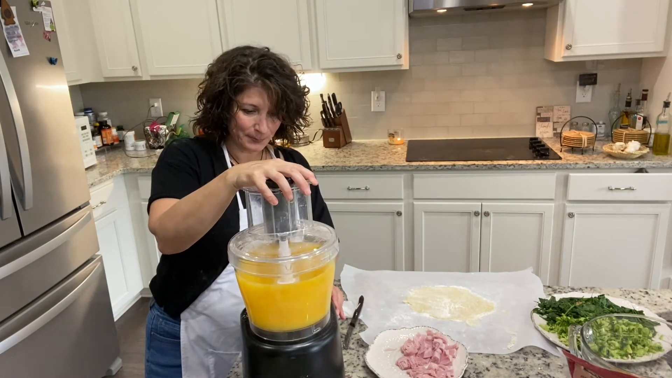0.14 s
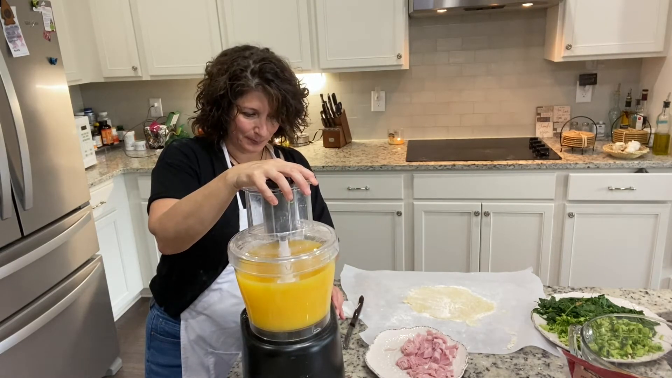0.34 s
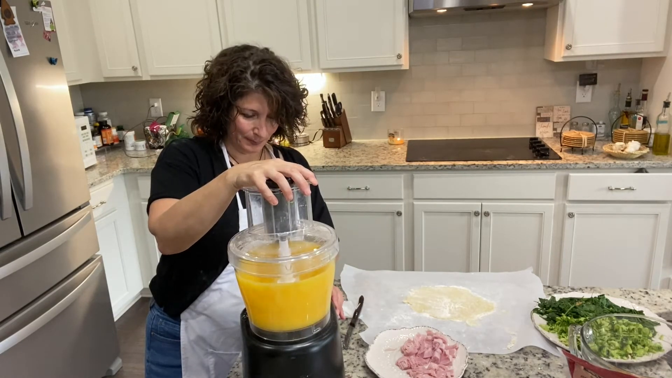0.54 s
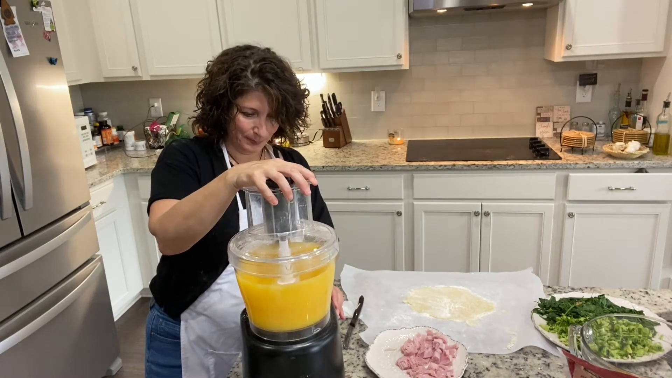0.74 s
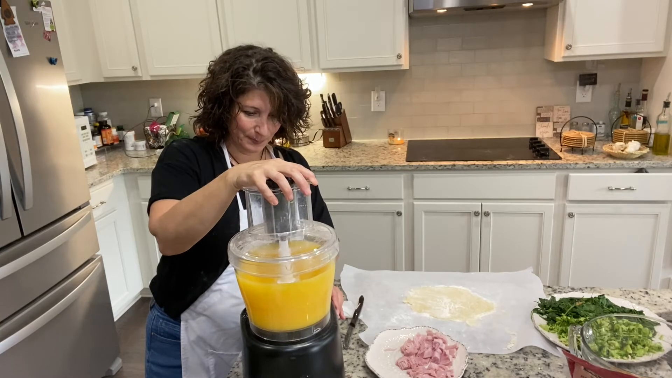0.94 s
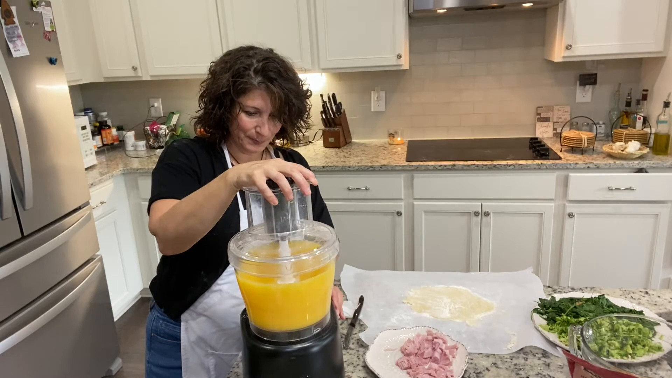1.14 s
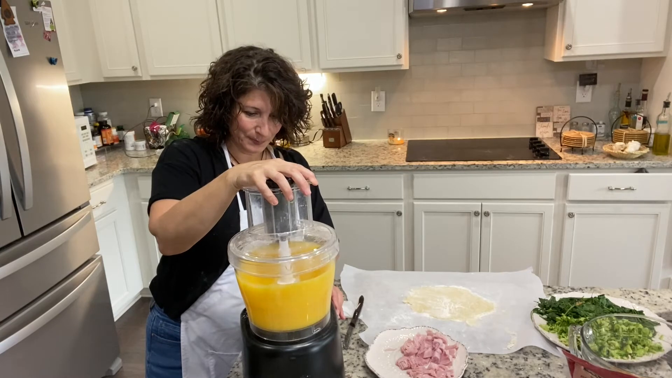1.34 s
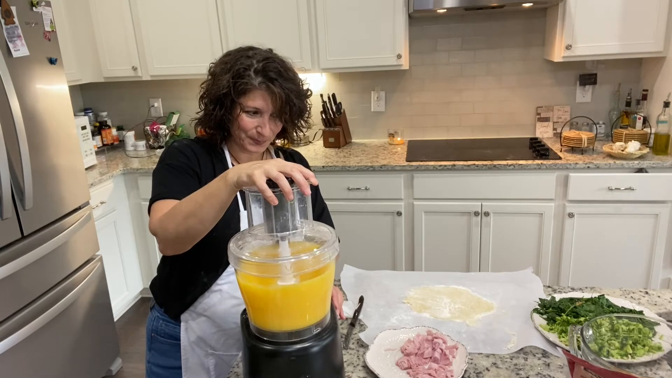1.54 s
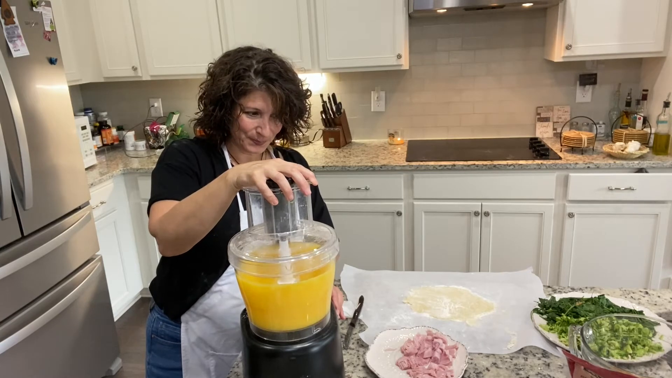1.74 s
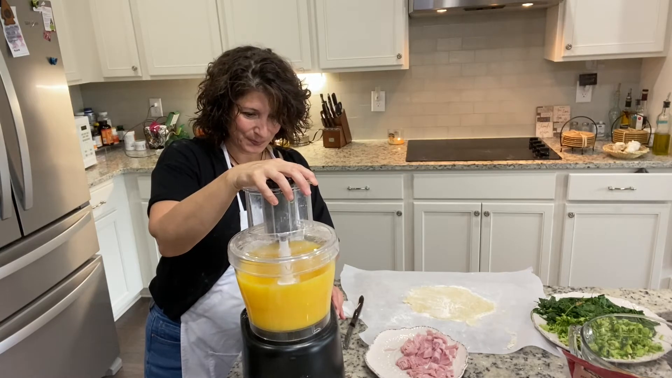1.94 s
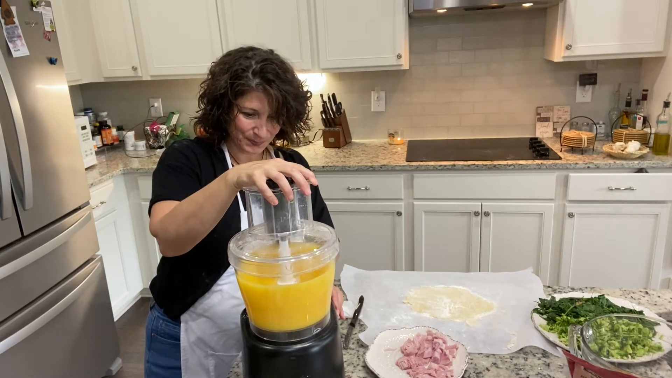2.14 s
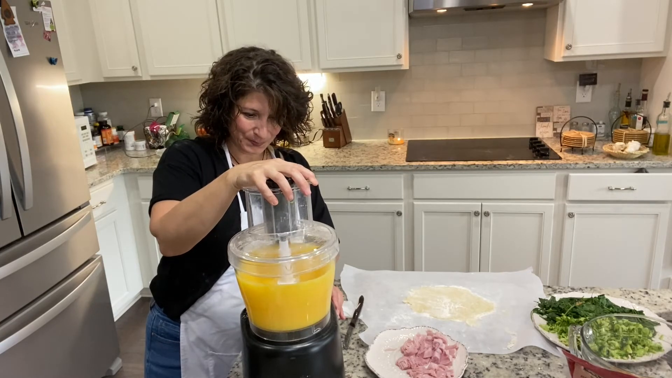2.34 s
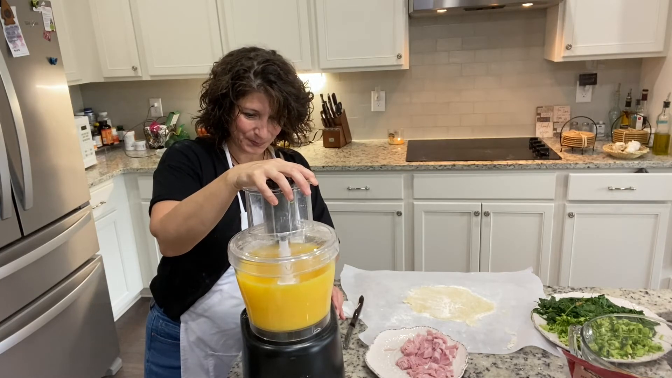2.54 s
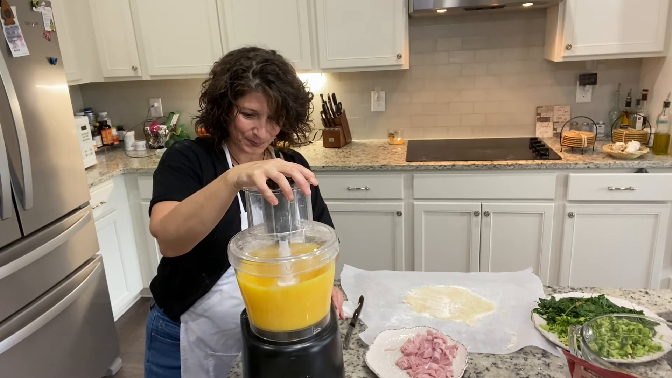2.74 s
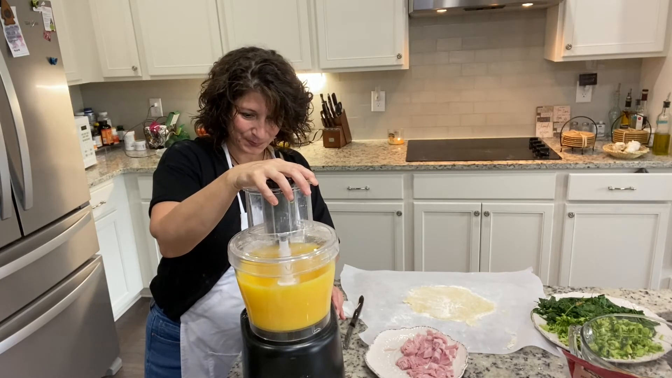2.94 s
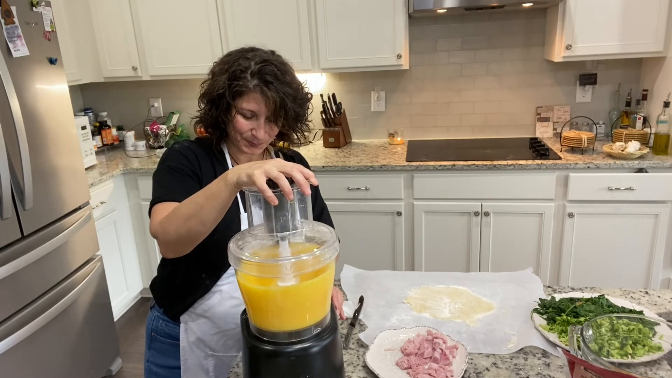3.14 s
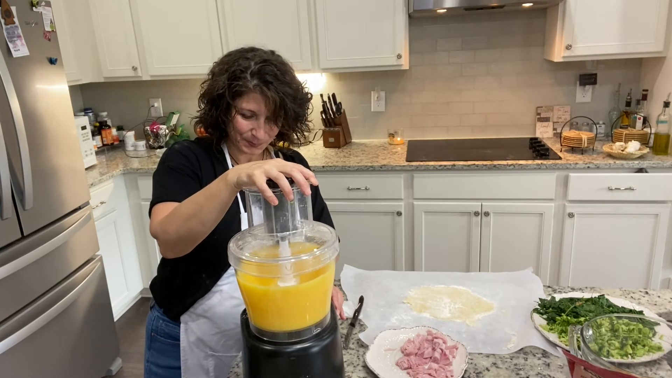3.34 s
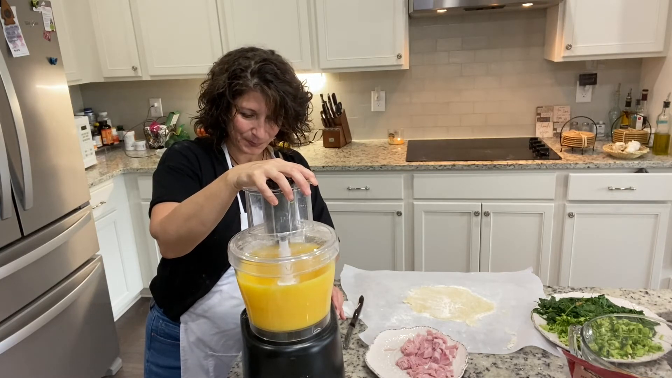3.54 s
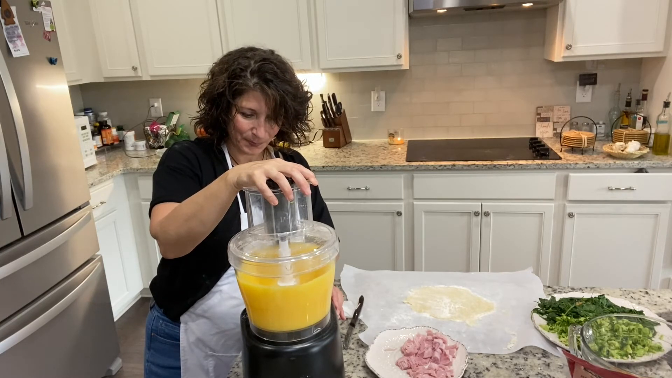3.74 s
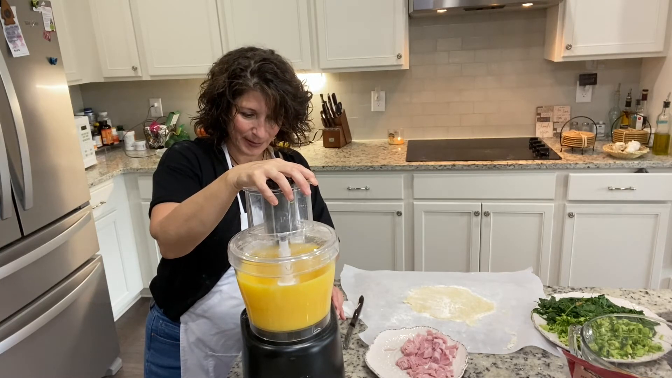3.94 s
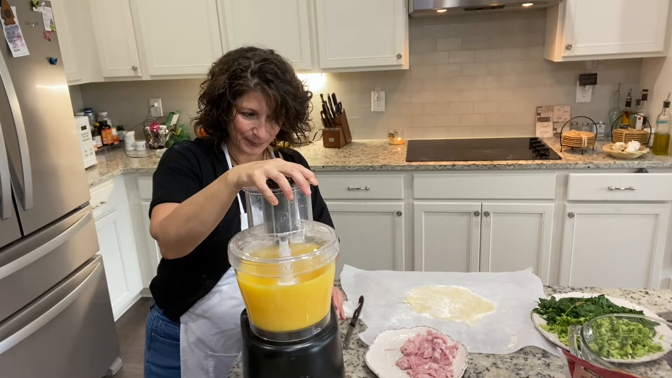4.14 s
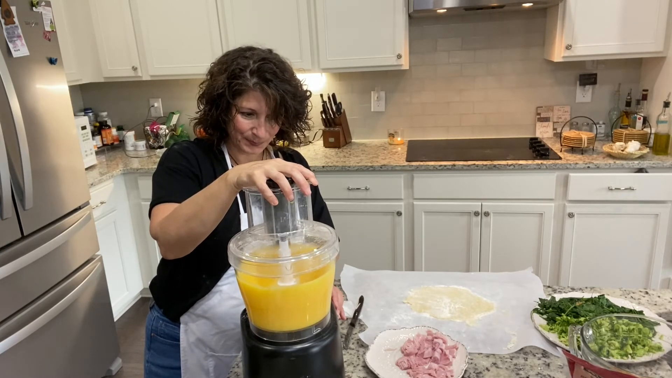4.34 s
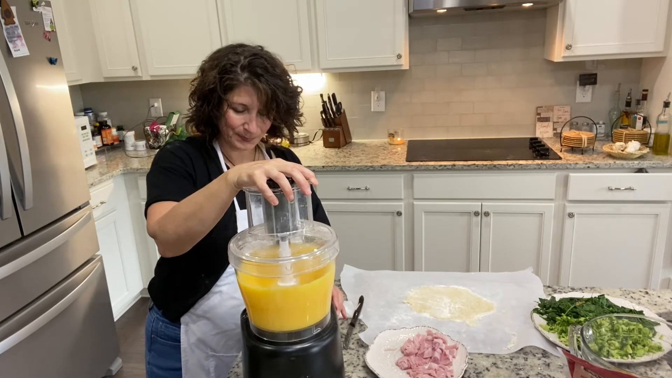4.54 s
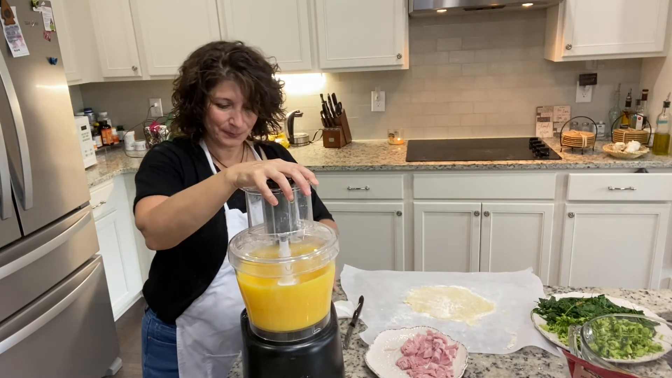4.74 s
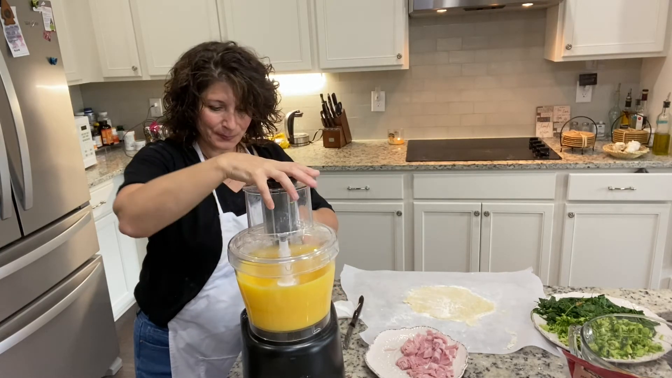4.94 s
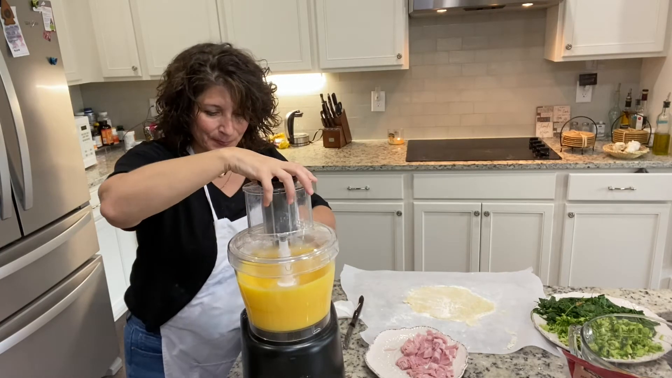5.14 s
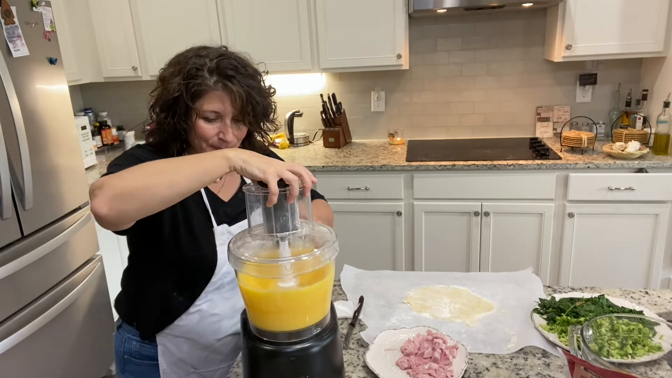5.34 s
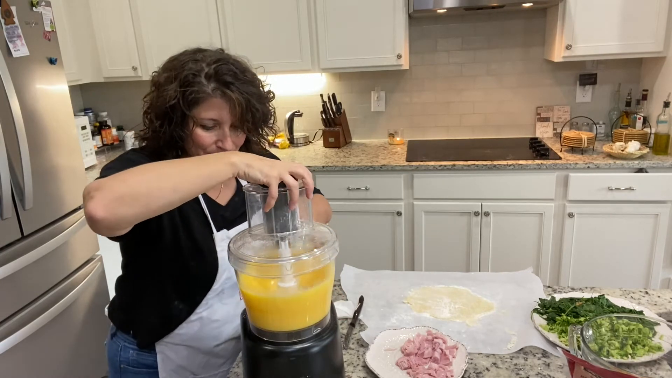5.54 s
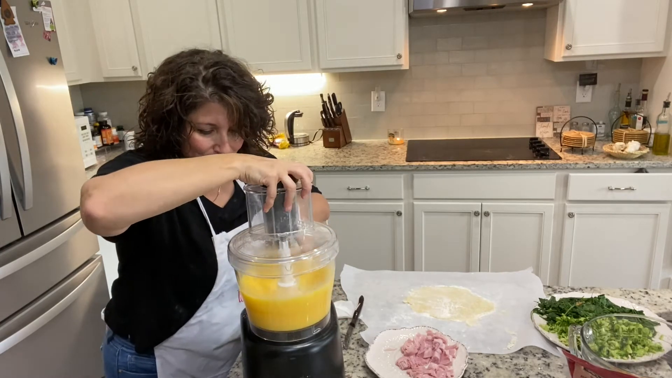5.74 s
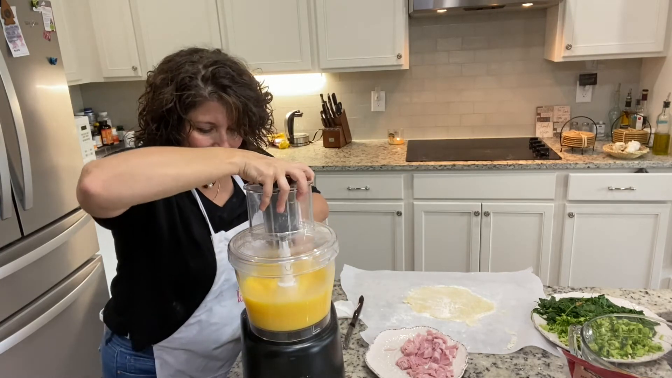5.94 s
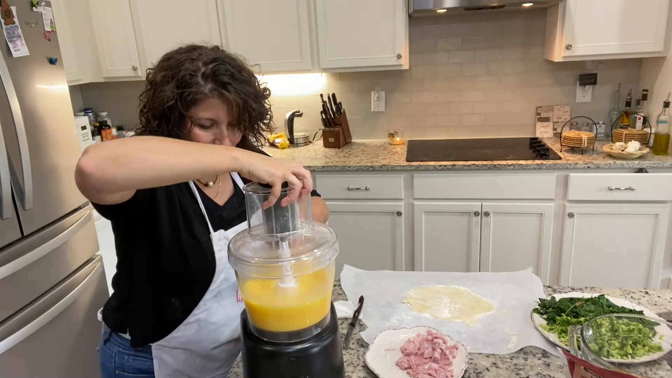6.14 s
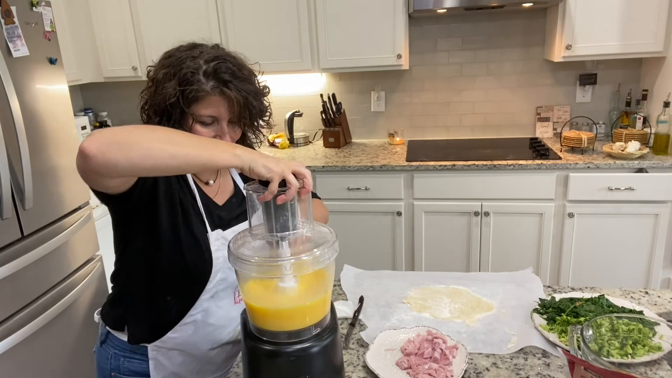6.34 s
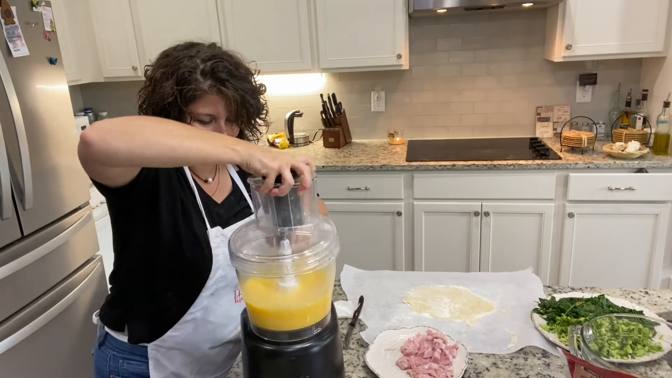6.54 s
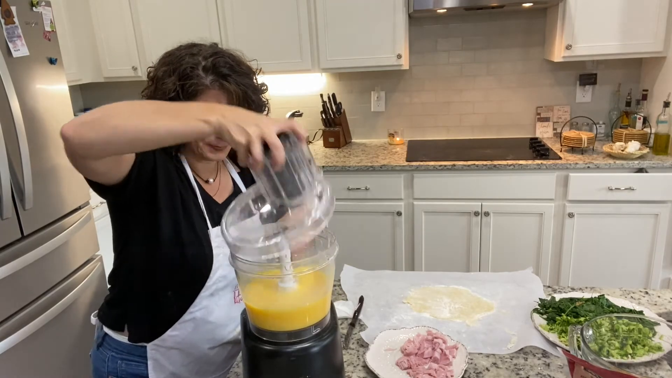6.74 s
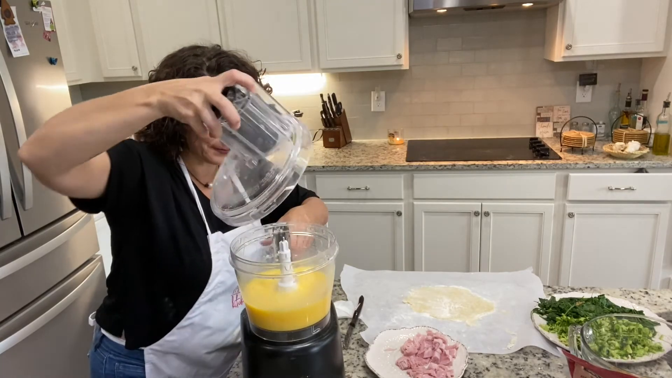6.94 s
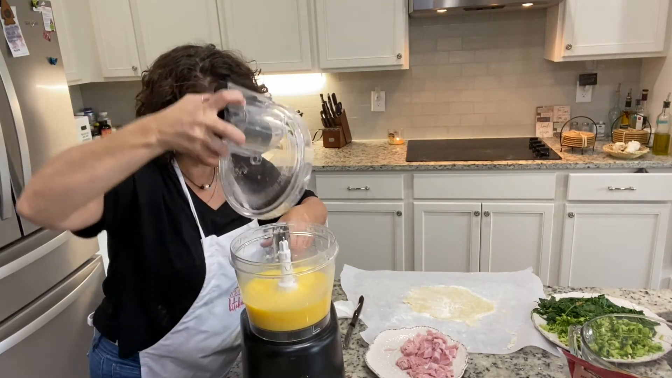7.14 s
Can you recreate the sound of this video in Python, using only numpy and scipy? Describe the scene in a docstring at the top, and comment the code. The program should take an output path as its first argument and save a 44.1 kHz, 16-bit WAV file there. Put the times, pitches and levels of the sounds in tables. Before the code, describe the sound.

From the start, a food processor runs at full power close to a stereo phone microphone in a small, hard kitchen. A rough, piercing whine around 2.6 kHz climbs slightly to nearly 2.8 kHz, wrapped in dense gear chatter, motor hum and airy hiss. Beaten egg churns underneath with muffled gurgles and little plops. Short clacks poke through near 3.0 and 3.7 seconds. At about 4.6 the power cuts: the whine gives way to a buzzing, rattling slide downward, breaking up and fading to rest by roughly 5.8. Light knocks begin around 5.6, with plastic scraping and ticking as the lid twists. A strong hollow clack with a thud lands at 6.1, then a sharper, brighter double clack at 6.5. Short room echoes die away, leaving faint ventilation rumble and refrigerator hum to the end, around 7.4.

```python
"""A food processor whisks eggs on a kitchen counter: reduction gears whine and chatter as noisy tooth knocks and
shaft-locked tones, with a few short clacks; the motor hums and hisses, the liquid churns as filtered noise,
gurgles and rising plops. Switched off, slack gears buzz and rattle down to rest; then the plastic lid, struck
modes and cracks, is twisted, unlatched and lifted. Two close microphone ports of a phone hear it in a small, hard room."""
import sys
import numpy as np
from scipy import signal
from scipy.fft import rfft, irfft, next_fast_len
from scipy.io import wavfile

SR = 44100
rng = np.random.default_rng(int(sys.argv[2]) if len(sys.argv) > 2 else 0)


def output_pcm(signal):
    """Save a mono or channel-first signal as 16-bit PCM at the path in sys.argv[1].

    Samples are clipped to [-1, 1] before scaling.
    """
    pcm = np.clip(np.atleast_2d(signal).T, -1, 1) * 32767
    wavfile.write(sys.argv[1], SR, np.round(pcm).astype(np.int16))


N = 321210
T = np.arange(N) / SR
TEETH = 94  # per blade turn

# broad colour of housing and bowl: [hz, level_db]
HOUSING_COLOUR = [(40, -22), (120, -14.5), (190, 2.5), (300, -3), (420, -5.5), (580, -13), (750, 3.5),
                  (1060, -1.5), (2100, -1.5), (2800, -1.5), (4200, -2.5), (4800, -12.5), (7000, -16.5),
                  (15000, -37)]
# resonances of housing and bowl: [centre_hz, width_hz, lift_db]
HOUSING_PEAKS = [(350, 46, 9.3), (690, 120, 4.9), (881, 70, 8.2), (1293, 110, 11.4), (1560, 72, 7.1),
                 (2260, 210, 4.2), (2670, 260, 6.8), (3190, 190, 7.9), (4050, 490, 1.7), (7770, 450, 8.4)]


def undb(db):
    """Decibels to gain."""
    return 10 ** (np.asarray(db) / 20)


def unit(x):
    """Scale to rms 1."""
    return x / np.sqrt(np.mean(x ** 2))


def curve(table):
    """Join (s, value) points by lines in time."""
    return np.interp(T, *np.transpose(table))


def at_hz(points, hz):
    """Read (Hz, value) points on a log-frequency axis."""
    rows = np.array(points)
    return np.interp(np.log(np.maximum(hz, 1)), np.log(rows[:, 0]), rows[:, 1])


def walk(rate):
    """Smooth random signal of rms 1 that changes about rate times a second."""
    size = next_fast_len(N, real=True)
    hz = np.fft.rfftfreq(size, 1 / SR)
    spectrum = rfft(rng.standard_normal(size)) / (1 + (2 * hz / rate) ** 2)
    return unit(irfft(spectrum, size)[:N])


def colour(x, points, peaks=(), size=4096):
    """Minimum-phase filter of unit power from a broad spectrum and resonances."""
    hz = np.fft.rfftfreq(size, 1 / SR)
    resonance_db = sum(lift / (1 + (2 * (hz - f) / width) ** 2) for f, width, lift in peaks)
    cepstrum = irfft(np.log(undb(at_hz(points, hz) + resonance_db)))
    response = irfft(np.exp(rfft(2 * cepstrum[:size // 2], size)))
    return signal.fftconvolve(x, response / np.linalg.norm(response))[:len(x)]


def lines(turns, orders, waver_db, waver_rate, slip):
    """Tones locked to a shaft, each wavering in level and phase; total rms 1."""
    out = 0
    for order, db in orders:
        cycles = order * turns + rng.random() + slip * walk(waver_rate)
        out = out + undb(db + waver_db * walk(waver_rate)) * np.sin(2 * np.pi * cycles)
    return unit(out)


def tooth_rate():
    """Tooth rate rises as the eggs thin; unpowered, dry friction and speed-proportional drag bring it to rest."""
    # tooth rate under power: [time_s, tooth_hz]
    powered_hz = [(0, 2560), (.2, 2577), (.5, 2575), (.75, 2624), (1, 2651), (1.7, 2711), (2.5, 2737),
                  (3.5, 2760), (4.62, 2786)]
    coast_s, friction_hz_per_s, drag_per_s = 4.605, 1520, .85
    coasting_s = np.maximum(T - coast_s, 0)
    friction_hz = friction_hz_per_s / drag_per_s
    return np.maximum((curve(powered_hz) + friction_hz) * np.exp(-drag_per_s * coasting_s) - friction_hz, 1)


def swell_of_gears_db():
    """Brief swells of gear sound; at 5.24 s the falling tooth tone rings a resonance near 905 Hz."""
    # [time_s, extra_db]
    gear_swells = [(.228, 5), (1.5, 5), (2.397, 6), (2.424, 8), (2.568, 5), (2.631, 8), (2.974, 5),
                   (4.096, 4), (4.626, 2.5), (5.24, 5)]
    return sum(db * np.exp(-((T - s) / 0.0043) ** 2) for s, db in gear_swells)


def chatter(tooth_hz, turns, speed, load, count=16000):
    """Each tooth knocks the housing, unevenly at speed and more regularly as the gears slow."""
    loaded_db, slack_db, slack_power = -27.5, -27, 1.46  # slack level at full speed
    chance = rng.standard_normal((count, 2))
    backlash = .3 * load * walk(110) + .5 * speed * (1 - load) * walk(50)  # teeth
    teeth = np.maximum.accumulate(TEETH * turns + backlash)
    at = np.searchsorted(teeth, np.arange(1, min(count, teeth[np.argmin(tooth_hz)])))
    late, force = chance[:len(at)].T
    unrest = speed[at] ** 2
    scatter = .05 + .1 * unrest  # tooth periods
    hit = np.clip(at + scatter * late * SR / tooth_hz[at], 0, N - 1).astype(int)
    size = undb((2.6 + 1.2 * unrest) * np.minimum(force, 2.2))
    pulses = np.bincount(hit, unit(size) * np.sqrt(SR / tooth_hz[at]), N)
    once_a_turn_db = 1.5 * np.sin(2 * np.pi * turns)
    strength = load * undb(loaded_db) + (1 - load) * undb(slack_db) * speed ** slack_power
    knocks = pulses * strength * undb(once_a_turn_db + .6 * walk(70) + swell_of_gears_db())
    highpass = signal.butter(2, 100, "high", fs=SR, output="sos")
    return colour(signal.sosfilt(highpass, knocks), HOUSING_COLOUR, HOUSING_PEAKS)


def bubbles(count=260):
    """Air beaten into the egg: short rising plops at random moments."""
    middle_hz, spread_octaves, decay_cycles = 1112, .65, 11
    rise = 0.11  # relative pitch rise over one decay
    out, t = np.zeros(N + SR), np.arange(SR // 16) / SR
    for when, pitch, force in rng.random((count, 3)):
        cycles = middle_hz * 2 ** (spread_octaves * (2 * pitch - 1)) * t
        age = cycles / decay_cycles
        at = int(when * N)
        out[at:at + len(t)] += 2 * force * np.exp(-age) * np.sin(2 * np.pi * cycles * (1 + rise * age / 2))
    return out[:N] * undb(-37)


def eggs(turns, speed):
    """Two blades churn the liquid in uneven gulps; air pockets gurgle at a shifting pitch and bubbles plop."""
    # churning egg: [hz, level_db]
    churn_colour = [(30, -32.5), (90, -16.5), (150, -6.5), (210, -1), (300, -8.5), (480, -7.5),
                    (620, -10.5), (1500, -27.5), (6000, -58.5)]
    # air pockets, retuned by the sloshing egg: [centre_hz, width_hz, level_db]
    pockets = [(852.4, 110, -45.5), (1322, 140, -45.5), (1527, 99, -43)]
    slosh_octaves, slosh_rate = .08, 9  # rms swing, changes per second
    gulps = undb(2.0 * walk(25) + 0.98 * np.sin(2 * np.pi * 2 * turns))
    gurgle = 0
    for hz, width_hz, db in pockets:
        phase = 2 * np.pi * np.cumsum(hz * 2 ** (slosh_octaves * walk(slosh_rate))) / SR
        level = undb(db + 2 * walk(slosh_rate))
        gurgle = gurgle + level * (walk(width_hz) * np.sin(phase) + walk(width_hz) * np.cos(phase))
    churn = colour(rng.standard_normal(N), churn_colour) * gulps * undb(-44.5)
    return (churn + gurgle + bubbles()) * speed ** 1.24


def whine(turns, load):
    """Loaded teeth sing at mesh rate with carrier sidebands and a rough overtone; thick eggs add strain."""
    # mesh tone and sidebands of the turning carrier: [blade_speed_multiple, level_db]
    mesh_orders = [(79, -22), (80.3, -22), (83.7, -17), (85, -21), (86, -13), (87, -13), (88.3, -18),
                   (89, -14), (89.3, -20), (90, -15), (91, -10.5), (92, -10.5), (93, -7.5), (94, 1.5),
                   (96.3, -17), (97.5, -14.5), (98.5, -10.5), (99.5, -17.5), (101.5, -21), (102.8, -21),
                   (104, -19), (105.5, -21), (107, -19.5), (110.3, -22)]
    # rough overtone: [blade_speed_multiple, level_db]
    overtone_orders = [(171.5, -9), (174, -9), (177, -8), (180, 0), (181.5, -2), (183, -1), (188.5, -7)]
    # further sidebands while thick eggs drag on the gears: [blade_speed_multiple, level_db]
    strain_orders = [(81.5, -5), (83, -7), (84.6, -3), (85.8, 0), (99.6, -5), (101.5, 0), (102.5, -5)]
    # brief changes in whine level: [time_s, extra_db]
    swells = [(.24, 0.5), (.62, -3.5), (2.5, 4), (4, 4), (4.58, 0.5)]
    swell_s = .13
    # level at the start and its drift
    mesh_db, mesh_db_per_s = -26, 0.55
    overtone_db, overtone_db_per_s = -38, -1.05
    strain_db, strain_db_per_s = -31.5, -6.5
    tone = lines(turns, mesh_orders, waver_db=1.2, waver_rate=18, slip=.02)
    flutter = undb(2.0 * walk(180) + .9 * np.sin(2 * np.pi * turns))
    swell_db = sum(db * np.exp(-((T - s) / swell_s) ** 2) for s, db in swells)
    strain = lines(turns, strain_orders, waver_db=3, waver_rate=22, slip=.1)
    overtone = lines(turns, overtone_orders, waver_db=1.8, waver_rate=35, slip=.14)
    mix = tone * undb(mesh_db + mesh_db_per_s * T + swell_db)
    mix = mix + overtone * undb(overtone_db + overtone_db_per_s * T)
    mix = mix + strain * undb(strain_db + strain_db_per_s * T)
    return mix * flutter * load * undb(0.45 * swell_of_gears_db())


def motor(turns, speed, load):
    """Field buzzes at twice the mains, brushes whistle, fan hisses; freewheeling, the rotor rumbles the base."""
    # brushes on the commutator: [motor_speed_multiple, level_db]
    brush_orders = [(24, -2), (30, -6), (36, 0), (48, -10)]
    # fan and brush hiss: [hz, level_db]
    hiss_colour = [(500, -21.5), (1500, 5.5), (2700, 13.5), (3600, -2), (4600, -0.5), (5300, 9.5),
                   (5750, 2), (7000, -3.5), (8400, -5), (8950, 3), (9600, -10.5), (12000, -6),
                   (13800, -7.5), (15200, -25)]
    # freewheeling rotor shaking the base: [hz, level_db]
    rumble_colour = [(80, -36), (160, -4), (210, -8), (330, -28.5), (2000, -69)]
    motor_ratio = 8.5  # motor turns per blade turn
    rumble_db = -38  # at full speed
    brushes = lines(motor_ratio * turns, brush_orders, waver_db=2, waver_rate=20, slip=.1) * undb(-49)
    field = np.sin(2 * np.pi * 120 * T) * undb(-64.5)
    hiss_level = undb(-32.5 + 1.0 * np.sin(2 * np.pi * turns) + 1.0 * walk(55))
    hiss = colour(rng.standard_normal(N), hiss_colour) * hiss_level
    hiss = hiss * speed ** 1.54 * undb(-2.5 * (0.5 - load))
    rumble = colour(rng.standard_normal(N), rumble_colour) * undb(rumble_db) * (1 - load) * speed ** 2
    return rumble + load * (brushes + field) + hiss


def hum(turns, speed):
    """Unbalanced motor shaft hums through the base; idler gears wobble below motor speed."""
    # shaft hum, motor speed at 8.5: [blade_speed_multiple, level_db]
    shaft_orders = [(2, -22), (4.1, -22), (5, -20), (5.5, -16), (6, -18), (8.5, 0), (9.5, -11), (11.5, -19),
                    (14, -21), (16, -19)]
    # idler gears: [blade_speed_multiple, level_db]
    idler_orders = [(6.5, 0)]
    # [time_s, level_db]
    shaft_level = [(0, -45.5), (.7, -36.5), (1.6, -37), (2.3, -36), (3, -41), (3.6, -44.5), (4.6, -45.5)]
    # [time_s, level_db]
    idler_level = [(0, -49), (1.7, -53), (3.2, -48.5), (4, -43), (4.6, -44.5)]
    shaft = lines(turns, shaft_orders, waver_db=.8, waver_rate=8, slip=.015) * undb(curve(shaft_level))
    idler = lines(turns, idler_orders, waver_db=2, waver_rate=12, slip=.05) * undb(curve(idler_level))
    return (shaft + idler) * speed ** 4


def kitchen():
    """Faint ventilation rumble as filtered noise, and a steady-pitched refrigerator hum."""
    # still kitchen: [hz, level_db]
    air_colour = [(20, -25), (38, -6), (55, -0.5), (70, 7), (85, -2), (105, -6.5), (170, -8), (350, -12.5),
                  (600, -18.5), (1200, -22), (2500, -43), (6000, -48), (15000, -49)]
    air = colour(rng.standard_normal(N), air_colour) * undb(-61 + 1.0 * walk(4))
    fridge = np.sin(2 * np.pi * 119.5 * T)
    return air + fridge * undb(-58.5 + 1.5 * walk(5))


def ring(modes, t, scatter=0.011):
    """Struck decaying modes, a little detuned at each blow but always of the same energy."""
    out = 0
    for hz, db, t60 in modes:
        gain = undb(db) * rng.choice([-1, 1])
        struck_hz = hz * (1 + scatter * rng.standard_normal())
        out = out + gain * np.sin(2 * np.pi * struck_hz * t) * np.exp(-np.log(1000) * t / t60)
    return .034 * out / np.sqrt(np.sum(out ** 2) / SR)


def clack(ring_db, centre_hz, crack_db, t):
    """One short contact: a crack, and a ring of plastic modes that favours those near one pitch."""
    # plastic lid and bowl: [mode_hz, level_db, t60_s]
    lid_modes = [(640, -1, .04), (692, -1, .04), (790, -1, .04), (905, 1.5, .03), (1231, -1, .034),
                 (1490, 0, .03), (1572, 0, .028), (1900, -3, .024), (2330, -2, .022), (2620, -2, .026),
                 (3250, -3, .02), (3750, -3, .016), (4200, -2, .026)]
    # crack of plastic on plastic: [hz, level_db]
    crack_colour = [(40, -29.5), (200, -6), (1200, 7.5), (2500, 2), (4000, 2), (5200, 0.5), (8000, -5.5),
                    (15000, -19.5)]
    contact_s, softening = 0.00089, .2  # rise time at ring_db = -9; its lengthening, dB per dB below that
    favoured = [(hz, db - 9 * abs(np.log2(hz / centre_hz)), t60) for hz, db, t60 in lid_modes]
    plastic = ring(favoured, t)
    burst = np.exp(-t / .003) + .05 * np.exp(-t / .02)
    crack = colour(rng.standard_normal(len(t)) * burst, crack_colour)
    contact = 1 - np.exp(-t / (contact_s * undb(-softening * (ring_db + 9))))
    return contact * (undb(ring_db) * plastic + undb(crack_db + 2.0) * crack)


def clacks_and_lid(count=5):
    """Gear clacks, then lid knocks: each clacks, a moment later thuds the base, and chatters in uneven rebounds."""
    # short gear clacks while running (near 2.8 kHz at 2.971 and 3.722 s), a brief ring near 910 Hz as the gears
    # coast # (5.234 s), then from 5.58 s the lid moved by hand; relative levels of counter thud, ring and
    # crack: # [time_s, thud_db, ring_db, ring_centre_hz, crack_db]
    contacts = [(0.681, -51, -41, 1280, -48), (2.971, -46, -26, 2800, -27), (3.722, -51.5, -20, 2870, -26),
                (5.234, -45, -30, 910, -34), (5.584, -39, -31, 970, -42), (5.681, -47, -45, 1500, -46),
                (5.7265, -39.5, -29.5, 1640, -28), (5.7891, -50, -25.5, 880, -36),
                (5.8026, -29, -33, 903, -37), (5.848, -34, -48, 794, -56.5), (5.931, -40.5, -52, 905, -51),
                (6.032, -28.5, -29, 920, -45.5), (6.067, -30.5, -32, 1103, -45.5),
                (6.1259, -17, -11.5, 887, -23.5), (6.353, -34.5, -51.5, 1500, -32),
                (6.3685, -29, -41, 1370, -27), (6.4855, -24, -9, 1570, -11.5),
                (6.502, -30, -15.5, 1855, -15), (6.5048, -15.5, -12.5, 690, -35),
                (6.581, -33.5, -40.5, 1383, -30), (7.0383, -72.5, -73.5, 3990, -68)]
    # base on the counter: [mode_hz, level_db, t60_s]
    base_modes = [(156.5, -4, 0.079), (187.2, 3, 0.074), (240, -4, 0.081), (367, -2.5, .056),
                  (445, -10, 0.039)]
    gap_s, rebound_db, rebound_db_per_s = 0.023, -14, -75  # median gap; level against the knock, fading
    out, t = np.zeros(N + SR), np.arange(SR // 8) / SR
    for s, thud_db, ring_db, centre_hz, crack_db in contacts:
        rocking_s = np.maximum(t - .004, 0)
        thud = ring(base_modes, rocking_s) * (1 - np.exp(-rocking_s / 0.0031))
        start = int(s * SR)
        out[start:start + len(t)] += clack(ring_db, centre_hz, crack_db, t) + undb(thud_db + 5.0) * thud
        late_s = 0
        for gap, force, place in rng.uniform(-1, 1, (count, 3)):
            late_s += gap_s * 2 ** gap
            drop_db = rebound_db + rebound_db_per_s * late_s + 3 * force
            at = start + int(late_s * SR)
            rebound_hz = centre_hz * 2 ** (place - .4)
            out[at:at + len(t)] += clack(ring_db + drop_db, rebound_hz, crack_db + drop_db - 9.0, t)
    return out[:N]


def buzz(tooth_hz, turns, speed, load):
    """Slack teeth buzz in a stack of rough overtones that catch and break off as the blade slows."""
    # [tooth_rate_multiple, level_db]
    buzz_orders = [(1, 0), (2, 0), (3, -2), (4, -1.5), (5, -2), (6, -3), (7, -4), (8, -5), (9, -6)]
    # gearbox carrying the buzz: [hz, level_db]
    gearbox_colour = [(100, -20), (350, -5), (560, -8), (850, 4.5), (1080, 0), (1400, 4), (2000, 2),
                      (2900, 2), (4000, -2), (5200, -8), (7000, -21), (15000, -44)]
    buzz_db, buzz_power = -28.5, 1.27  # level at full speed, fade as a power of speed
    out = 0
    for order, db in buzz_orders:
        slip_cycles = (.05 + .32 * speed) * order ** .6 * walk(110)
        breaks_db = (1 + 3.2 * (1 - speed)) * np.tanh(1.5 * walk(28))
        flutter_db = 2.8 * np.tanh(walk(70)) + 2.1 * walk(200)
        cycles = order * TEETH * turns + slip_cycles
        out = out + undb(db + breaks_db + flutter_db) * np.sin(2 * np.pi * cycles)
    stalling = np.minimum(tooth_hz / 300, 1)
    level = (1 - load) * stalling * speed ** buzz_power * undb(buzz_db + swell_of_gears_db())
    return colour(unit(out) * level, gearbox_colour)


def twist():
    """The lid's rim sticks and slips round the bowl in dense, tiny ticks that sound through the bowl."""
    # [start_s, length_s, level_db]
    slides = [(5.805, 0.1, -65), (6.024, 0.01, -53.5), (6.113, 0.068, -47.5), (6.35, .005, -46),
              (6.484, .005, -32)]
    attack_s, release_s = 0.0034, 0.017
    slips = (rng.random(N) < 1500 / SR) * rng.standard_normal(N)  # about 1500 ticks per second
    push = 0
    for s, length_s, db in slides:
        before = np.maximum(s - T, 0) / attack_s
        after = np.maximum(T - s - length_s, 0) / release_s
        push = push + undb(db) * np.exp(-before - after)
    return colour(unit(slips), HOUSING_COLOUR, HOUSING_PEAKS) * push


def reverberate(x, size=32768):
    """Echoes from tiles and cabinets, separate at first and then dense, partly alike at both ports."""
    # [hz, t60_s]
    room_t60 = [(100, 0.29), (300, 0.72), (1000, 0.62), (3500, 0.64), (8000, 0.53), (15000, 0.38)]
    density = np.minimum(.05 + (np.arange(size) / SR / .45) ** 2, 1)
    echoes = rng.standard_normal((2, size)) * (rng.random((2, size)) < density) / np.sqrt(density)
    hz, t, cells = signal.stft(echoes, SR, nperseg=256)
    decay = np.exp(-np.log(1000) * t / at_hz(room_t60, hz)[:, None])
    cells = cells * decay * (1 - np.exp(-t / 0.00051))
    likeness = np.clip(at_hz([(150, 0.8), (600, 0.05), (5000, 0.05), (9000, 1.0)], hz), 0, .95)[:, None]
    mid, side = signal.istft(cells * np.sqrt([1 + likeness, 1 - likeness]), SR)[1]
    tails = (mid + side, mid - side)
    return np.array([signal.fftconvolve(x, tail / np.linalg.norm(tail))[:N] for tail in tails])


def ports(pair):
    """The phone's body shifts phase and level between its two ports."""
    # [hz, left_lead_rad]
    port_phase = [(0, 0), (300, .3), (700, -.9), (2000, -.4), (2700, -1.4), (4000, -.1), (5200, -2),
                  (7000, -.4), (8400, .2), (10400, 3.1), (13000, 6.3), (15600, 9.4)]
    # [hz, left_minus_right_db]
    port_balance = [(60, 2), (110, -2), (200, 0), (380, 3.5), (700, -0.5), (1290, -0.5), (2380, 0.5),
                    (4400, -2.5), (8120, -1), (15000, -1.5)]
    size = next_fast_len(N + SR)
    hz = np.fft.rfftfreq(size, 1 / SR)
    phase = np.interp(hz, *np.transpose(port_phase))
    half = np.array([[.5], [-.5]])
    response = np.exp(1j * half * phase) * undb(half * at_hz(port_balance, hz))
    return irfft(rfft(pair, size) * response, size)[:, :N]


def scene():
    """One speed and one load drive the whole machine; the lid follows."""
    off_s, off_fade_s = 4.635, 0.011
    tooth_hz = tooth_rate()
    speed = tooth_hz / tooth_hz.max()
    turns = np.cumsum(tooth_hz) / TEETH / SR  # of the blade
    load = np.clip((off_s - T) / off_fade_s + .5, 0, 1)
    rattle = chatter(tooth_hz, turns, speed, load) + eggs(turns, speed)
    tones = whine(turns, load) + motor(turns, speed, load)
    whirr = buzz(tooth_hz, turns, speed, load)
    knocks = clacks_and_lid() + twist()
    room = reverberate(undb(-4.5) * rattle + undb(-9.5) * tones + undb(-2.0) * whirr + undb(-6.5) * knocks)
    return ports(rattle + tones + hum(turns, speed) + whirr + knocks + room + kitchen())


def record(dry):
    """The phone cuts the top: a steep elliptic low-pass."""
    top_hz = 15300
    return signal.sosfilt(signal.ellip(8, .2, 70, top_hz, fs=SR, output="sos"), dry)


dry = scene()
out = record(dry)
output_pcm(out)
```